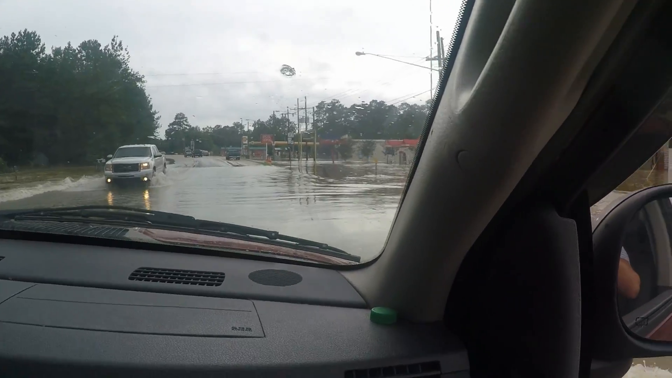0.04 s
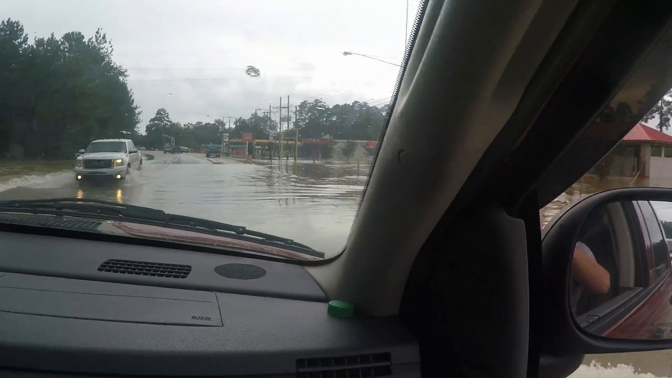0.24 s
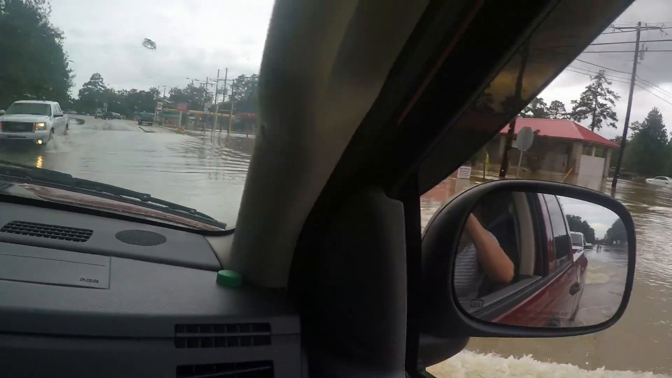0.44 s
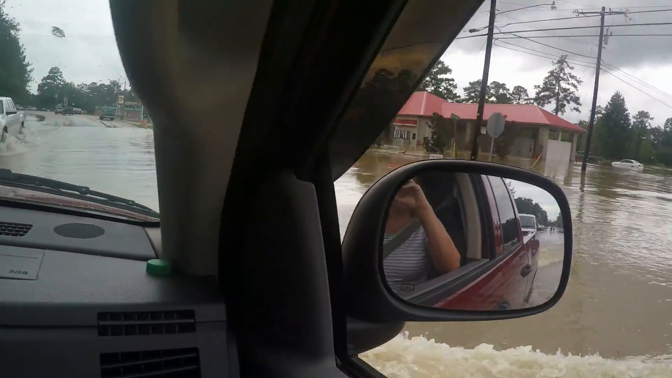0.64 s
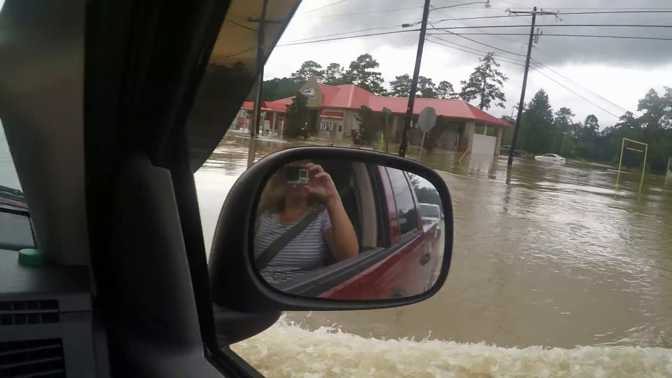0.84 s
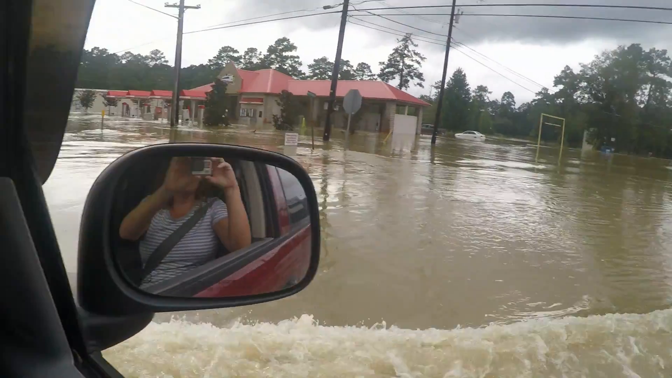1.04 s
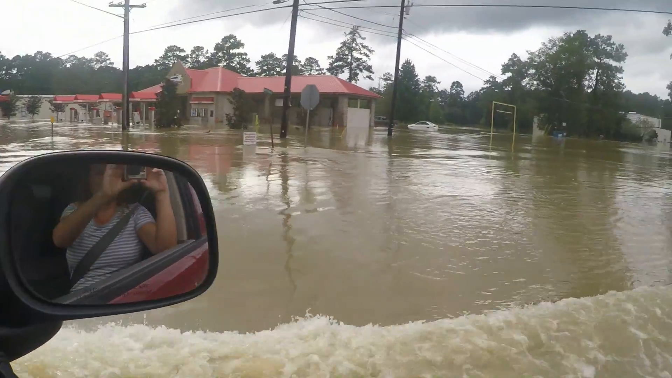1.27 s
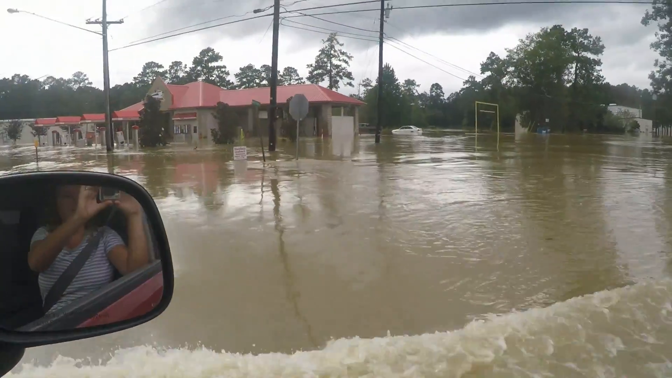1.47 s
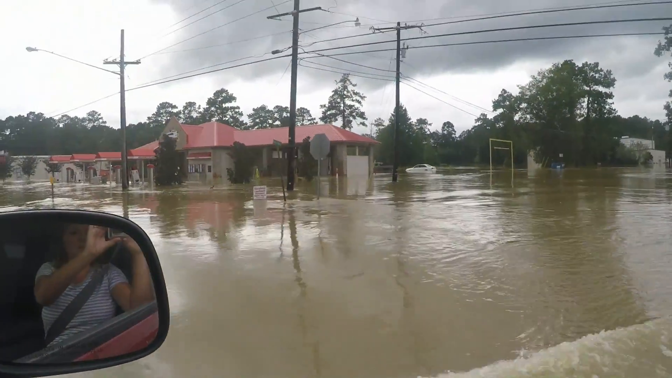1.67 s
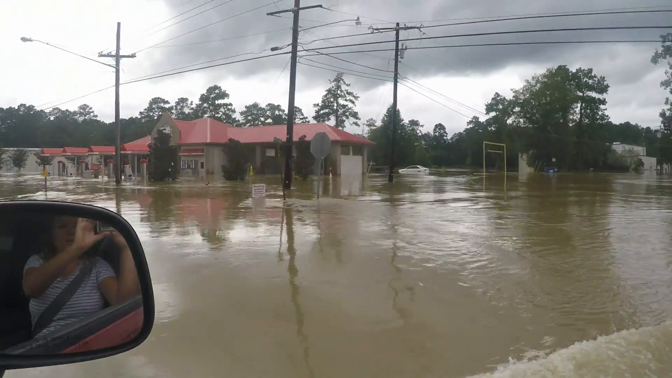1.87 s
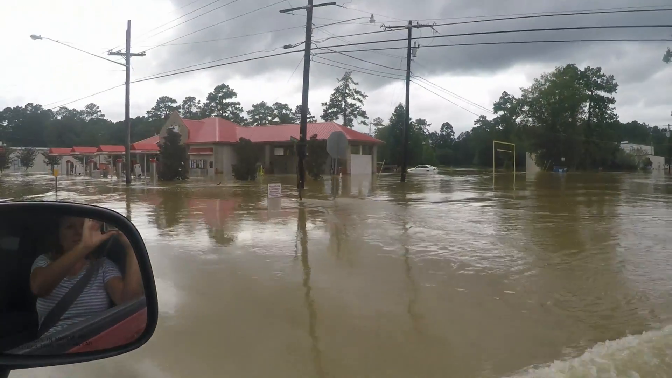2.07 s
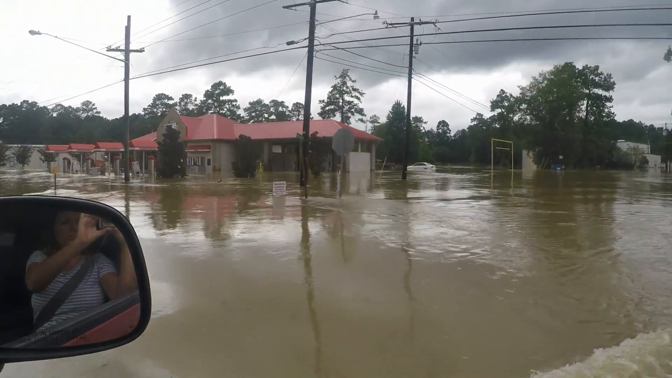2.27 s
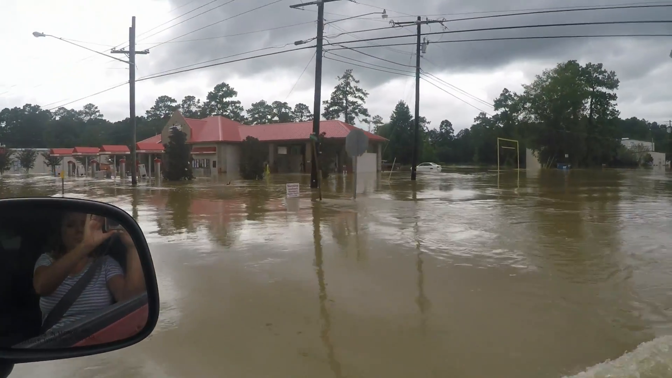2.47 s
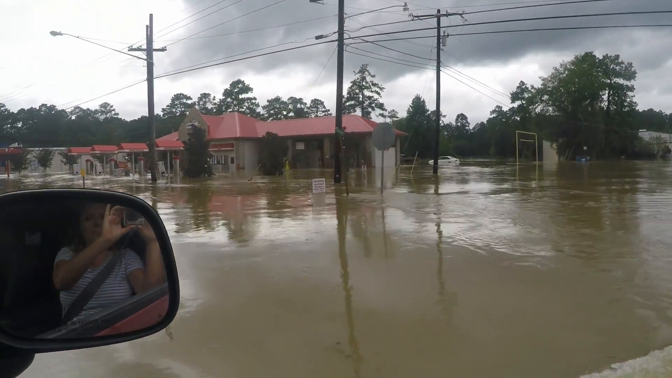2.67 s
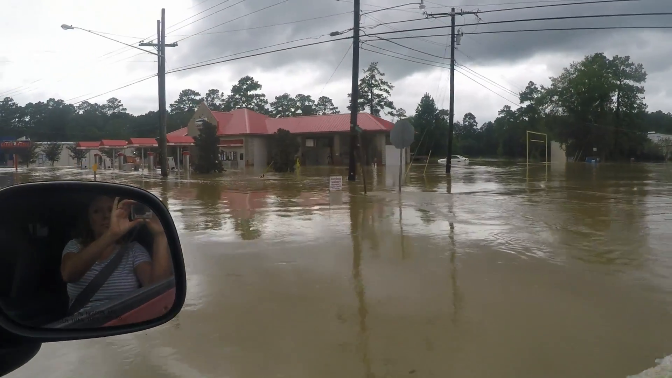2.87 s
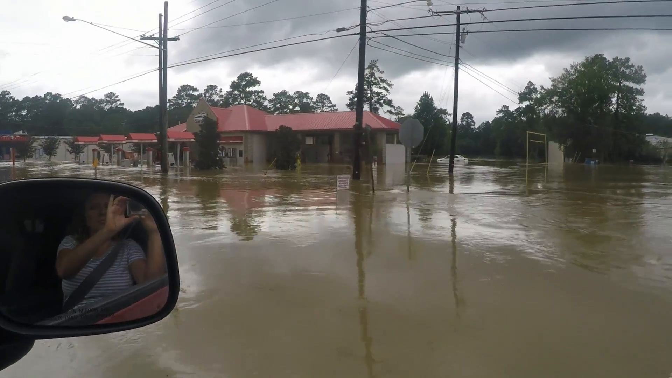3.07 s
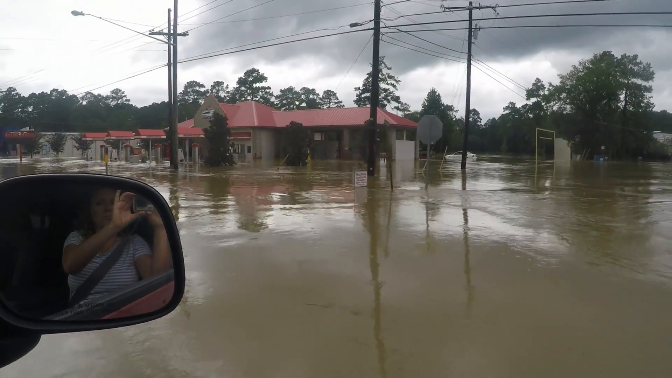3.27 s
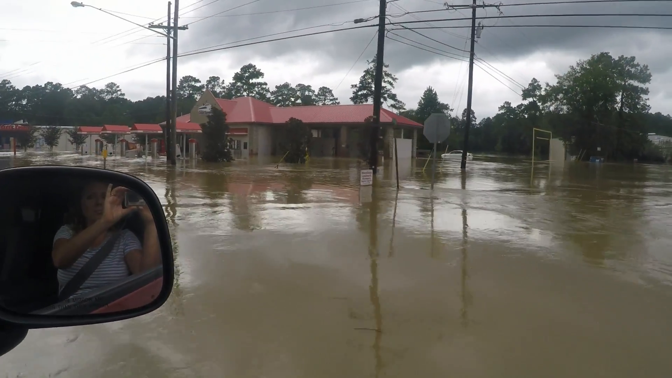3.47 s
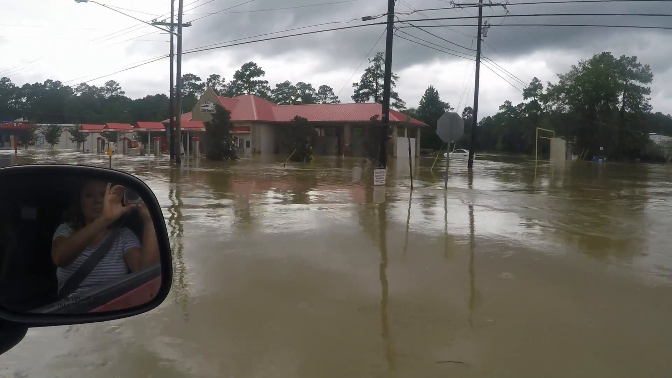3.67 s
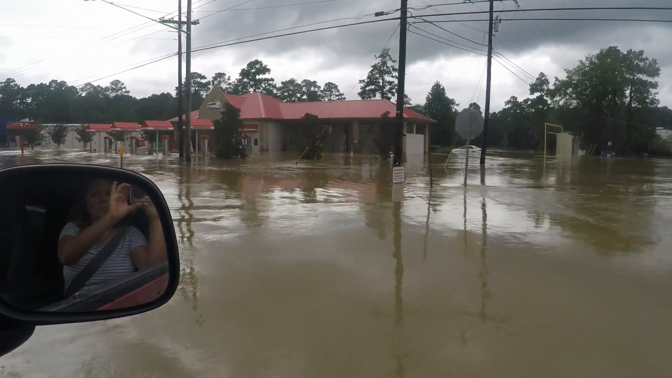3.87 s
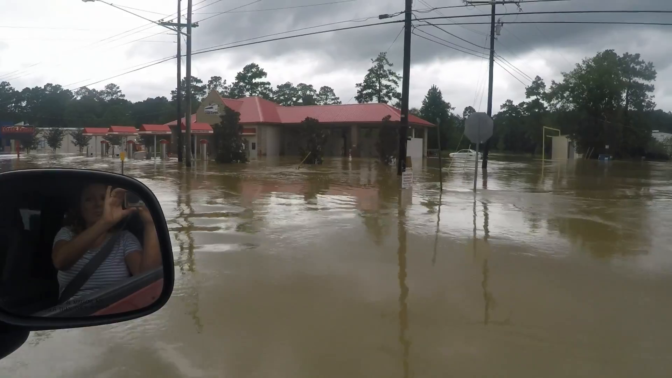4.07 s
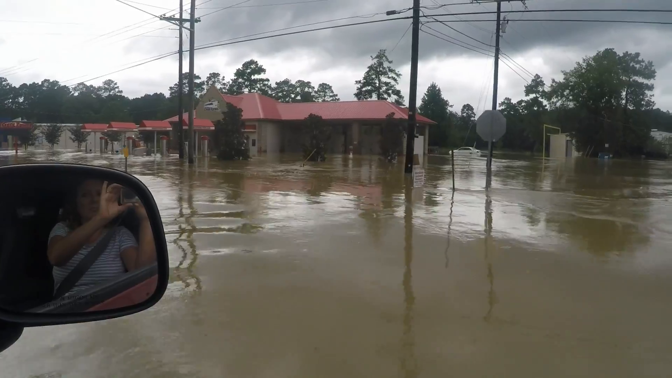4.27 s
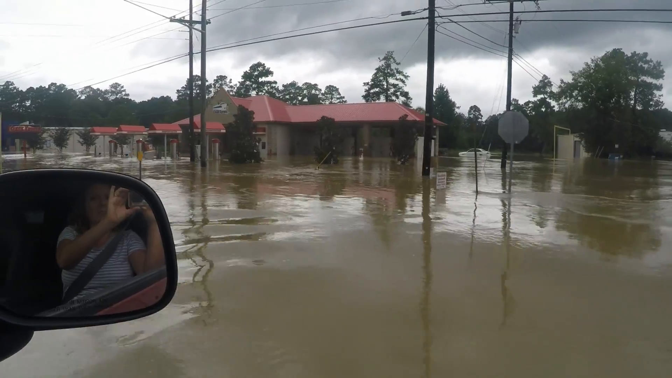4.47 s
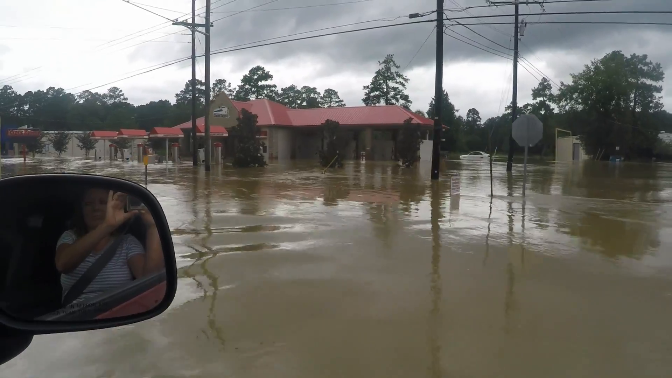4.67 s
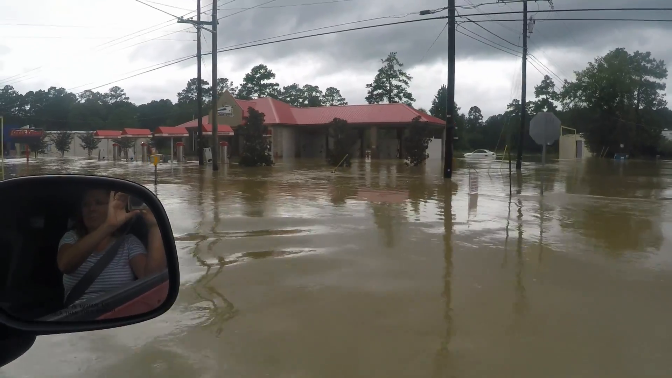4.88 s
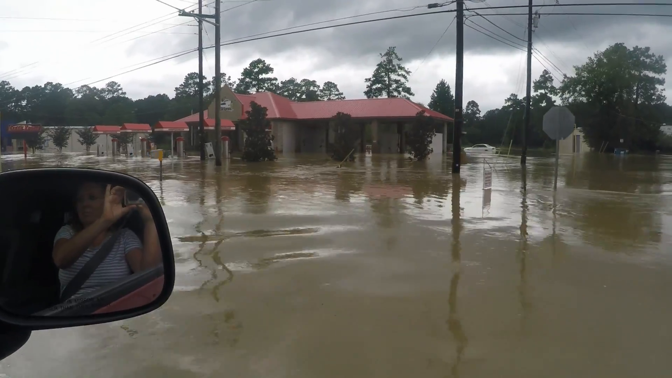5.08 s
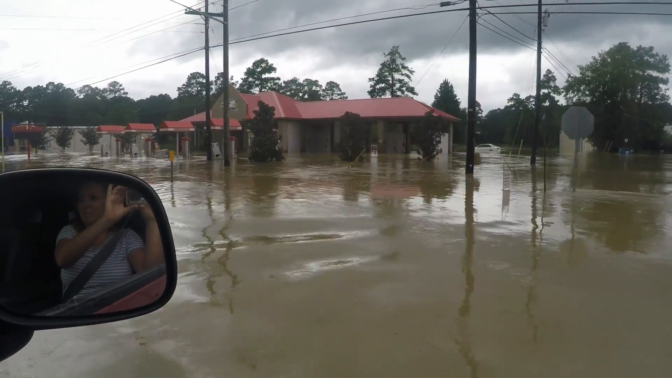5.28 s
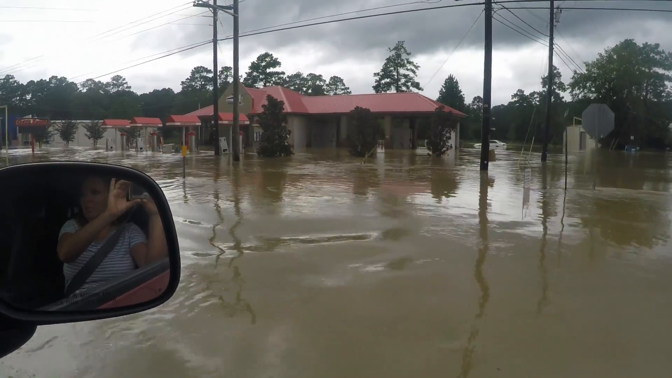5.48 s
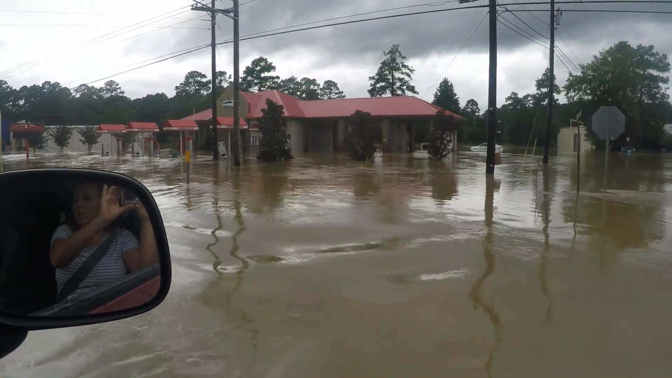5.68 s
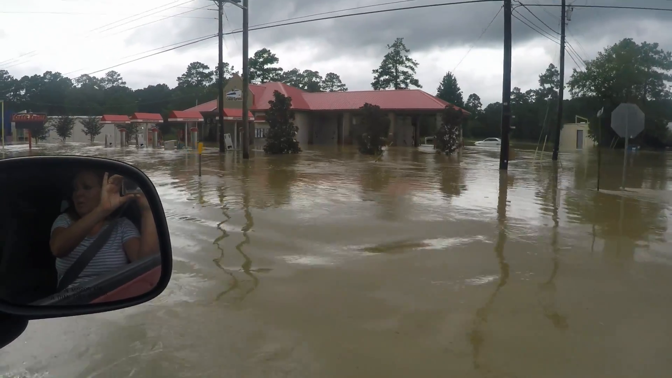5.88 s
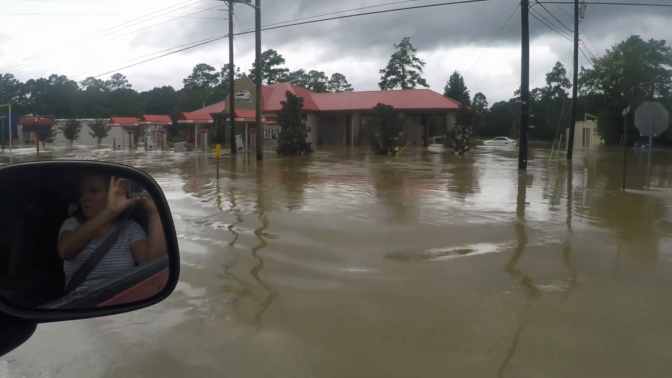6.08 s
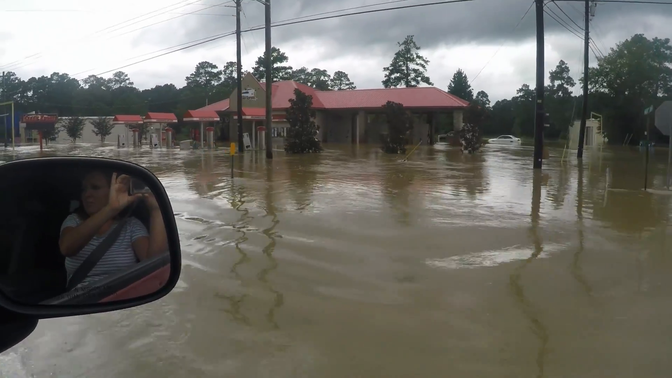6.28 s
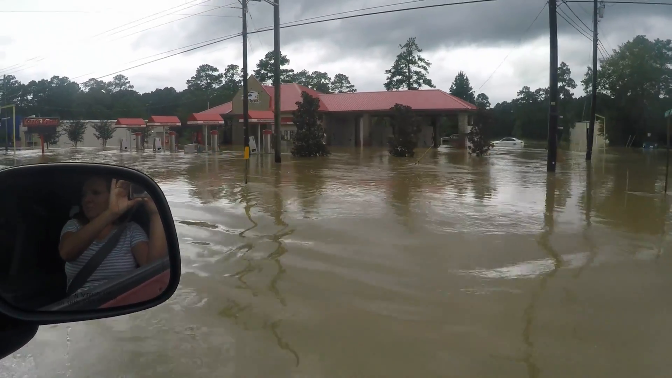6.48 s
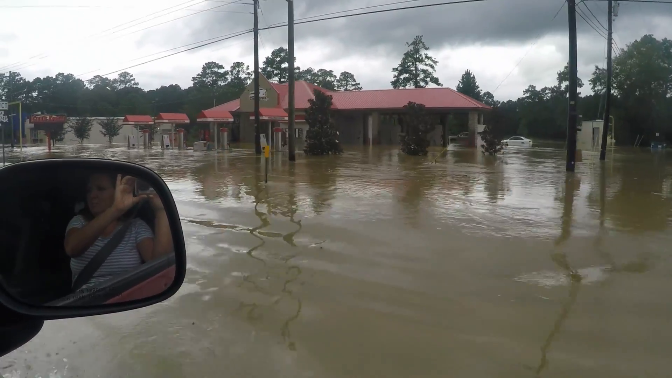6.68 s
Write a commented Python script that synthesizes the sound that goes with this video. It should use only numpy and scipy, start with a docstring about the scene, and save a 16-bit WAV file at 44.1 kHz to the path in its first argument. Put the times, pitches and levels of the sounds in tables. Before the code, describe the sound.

A vehicle wades slowly through deep floodwater with a steady hissing rush, while fingers rub, squeak and tap on the handheld phone early on.

```python
"""Truck wading through floodwater

A truck wades slowly through deep water, heard at its open side window on a hand-held phone.
Bow wave: noise, ringing bubbles and spray clicks. Rumble: coloured noise. Engines: muffled firing orders.
At first fingers rub (filtered slips), squeak (rough sines), tap (ringing modes) and press (low swings)
on the phone's case; later the crest slaps back in short showers of drops."""
import sys
import numpy as np
from scipy import signal
from scipy.fft import rfft, irfft
from scipy.io import wavfile

SR = 44100
rng = np.random.default_rng(int(sys.argv[2]) if len(sys.argv) > 2 else 0)


def materialize(psi):
    """Save the field psi as 16-bit PCM at rate SR to the path in sys.argv[1].

    A 1-D psi becomes a single channel; in a 2-D psi each row is a channel.
    """
    bounded = np.clip(np.atleast_2d(psi).T, -1, 1)
    quanta = np.round(bounded * 32767).astype(np.int16)
    wavfile.write(sys.argv[1], SR, quanta)


N = 296686
TIME = np.arange(N) / SR
HZ = np.fft.rfftfreq(N, 1 / SR)

# Bow wave colour: (frequency [Hz], relative density [dB per Hz])
WATER_COLOUR = [(100, -21.5), (300, -10.5), (480, -15.5), (850, -7.5), (1250, -8), (1600, 0), (2200, 0.5),
                (3400, -3), (4200, -10), (5500, -15), (7500, -17), (10300, -23), (12500, -31),
                (15500, -30.5)]
# Peaks and notches of cupped hand and microphone port: (centre [Hz], width [Hz], height [dB])
PORT_PEAKS = [(1391, 120, -11.5), (1750, 400, 0), (2168, 360, -4), (2703, 410, 4), (3020, 200, -3.5),
              (4010, 81, -7), (6070, 490, -4.5), (7260, 680, 2), (8440, 1900, -2.5)]
# Bow wave rush as the phone turns from cab to window: (time [s], level [dB])
RUSH_LEVEL_DB = [(0, -40), (.3, -46), (.7, -42), (1.35, -42.5), (1.55, -39.5), (1.9, -40), (3.5, -39.5),
                 (6.1, -40.5), (6.73, -39.2)]
# Spray above 5 kHz: shaded by the cab until the phone faces the window, then slowly brightens
SPRAY_LIFT_DB, SPRAY_DB_PER_S, SHADE_DB, WINDOW_S = -1.1, 0.45, -0.5, 1.6

# Road and wind rumble: (frequency [Hz], relative density [dB per Hz])
RUMBLE_COLOUR = [(10, -11), (27, 5), (45, -3), (62, -4), (100, -10.5), (135, -14), (180, -14), (240, -18.5),
                 (320, -22), (450, -26), (900, -37), (4000, -90)]
# Buffeting while the phone is turned: (frequency [Hz], relative density [dB per Hz])
BUFFET_COLOUR = [(10, -3), (26, 6), (48, -0.5), (75, -8), (130, -19), (200, -19.5), (300, -38), (700, -25),
                 (3000, -80)]
ROAD_DB, TURNING_DB, TURN_END_S, TURN_SETTLE_S = -47, -41, 0.73, 2

# Passed by exhaust pipes and cab: (frequency [Hz], relative gain [dB])
EXHAUST_GAIN = [(75, 2.5), (100, -5.5), (122, 2.5), (150, -7.5), (175, 7.5), (205, -6.5), (240, -3),
                (300, -11), (360, -9), (410, -6.5), (470, -40)]
# Truck's engine, idling then lightly throttled: (time [s], mean firing rate [Hz], mean level [dB])
OWN_ENGINE_TRACK = [(0, 71, -65), (1.9, 70, -54.5), (3.6, 72.5, -57), (4.6, 72, -65.5), (5.8, 73.2, -60),
                    (6.73, 78.6, -52)]
# Another engine pulling through its gears:
# (start [s], end [s], mean level [dB], from rate [Hz], towards rate [Hz], time constant [s])
GEAR_REVS = [(0, .52, -56, 93, 108.5, 0.3), (0.651, 1.302, -57.5, 96.1, 84, 0.37),
             (2.8, 3.55, -64, 79.6, 102.2, .55), (3.552, 5.95, -56, 68.9, 124.4, .44)]
REV_FADE_IN_SHARE, REV_FADE_OUT_SHARE = 0.12, 0.16

# Fingers sliding on the case; the three times are sorted before use: (start [s], strongest [s],
# end [s], level before swell [dB], treble tilt [dB per octave], air pocket [Hz], upper edge [Hz])
RUB_STROKES = [(.017, .066, .12, -38.5, 5, 3100, 12000), (0.115, 0.126, .16, -33, 3.5, 3020, 16000),
               (0.168, .219, .228, -36, 2, 3300, 16000), (0.278, .354, 0.4, -38, 0.5, 2400, 16000),
               (0.367, 0.405, 0.4, -32.5, 0, 2330, 16000), (0.437, .444, .48, -37.5, -.5, 1580, 11000),
               (0.477, 0.524, .53, -35, -2.5, 2100, 12000), (0.583, 0.604, 0.62, -30.5, 0.5, 2060, 11000),
               (0.608, 0.638, 0.67, -26.5, 0.3, 1650, 10100), (0.727, 0.737, 0.8, -30.5, -4, 1580, 11000),
               (0.736, 0.781, .83, -27.5, -0.5, 1540, 13000), (.79, 0.832, 0.896, -33.5, 0, 1550, 13000),
               (0.97, 1.015, 1.087, -33.5, 0, 1360, 16000), (1.209, 1.21, 1.268, -38.5, 5, 3020, 16000),
               (1.4, 1.426, 1.46, -29.5, -0.7, 1980, 10900), (1.437, 1.5, 1.67, -38.5, -1, 1730, 11000),
               (2.407, 2.47, 2.485, -34.5, 0.6, 2000, 16000),
               (2.491, 2.493, 2.57, -36.5, -0.5, 1970, 12000)]
# Skin on case: (frequency [Hz], relative density [dB per Hz])
SKIN_COLOUR = [(60, -7), (200, -2), (480, -13), (850, -2), (1500, 0.5), (3000, -1.5), (4500, -5),
               (7000, -12), (10000, -19.5), (15500, -18.5)]
# Case resonances: (centre [Hz], width [Hz], height [dB])
CASE_PEAKS = [(1120, 180, -5.5), (2330, 200, 1.5), (2850, 690, 8), (3500, 520, -1), (4230, 500, 7.5),
              (4900, 210, 1.5), (5380, 480, 3.5), (6030, 290, -3.5), (6860, 330, 2.5), (8600, 710, -5),
              (9800, 1600, 5.5)]
POCKET_DB, POCKET_HALF_WIDTH_HZ = 9, 203

# Skin sticking and slipping: (start [s], strongest [s], end [s], level before swell [dB], mean pitch [Hz])
SQUEAK_STROKES = [(0.028, .039, 0.049, -27, 3116), (0.04, 0.082, 0.15, -44, 3050),
                  (0.115, 0.134, 0.14, -25.5, 3120), (.135, 0.143, 0.17, -35, 3170)]
# Fingertip taps: (time [s], peak level [dB], dull modes against bright ones [dB])
FINGER_TAPS = [(0.1899, -23, -25), (.39, -25, -8), (.415, -25, -12), (.4408, -39, -15), (.5179, -7, -3.5),
               (0.5229, -18.5, -1), (.574, -30, 12), (.594, -28, 15), (0.61, -27.5, 6), (.872, -29, -6),
               (.879, -25.5, -3), (1.283, -24, -10), (1.314, -30, 2), (1.3975, -16, -11.5),
               (1.4483, -15, -6.5), (2.410, -33, 0), (2.4609, -19, -5.5), (2.470, -24.5, 1),
               (2.524, -24, -6)]
# Case modes rung by a tap: (frequency [Hz], relative level [dB], t60 [s])
CASE_MODES = [(246, -5, 0.019), (508, -5, 0.016), (900, 6.5, 0.0084), (1500, -2, 0.0062),
              (2320, -10.5, 0.0071), (2910, -8.5, 0.018), (3506, -5.5, 0.013), (5300, -13, .007),
              (9000, -19, 0.0062)]
# Grip pressing on the case: (time [s], peak level [dB], swing frequency [Hz])
GRIP_PRESSES = [(0.193, -28, 66.5), (0.237, -27.5, 25), (0.439, -32, 45), (.521, -24, 55), (.59, -29.5, 80),
                (0.756, -29, 69.5), (.895, -31.5, 87.5), (1.111, -32, 42), (1.447, -26.5, 85.6),
                (1.584, -25, 37.7), (1.596, -36, 139), (1.666, -29.5, 134), (1.735, -36, 151),
                (2.408, -32, 107), (2.461, -32, 169), (2.477, -29.5, 76), (2.521, -28, 62),
                (2.565, -32, 85), (2.674, -33.5, 35.07)]

# Crest slapping back on the water: (time [s], level before swell [dB])
CREST_SPLASHES = [(1.709, -41.5), (2.6, -42), (3.055, -41.5), (3.26, -45.5), (3.457, -39.5), (4.07, -45.5),
                  (4.683, -41), (5.16, -42.5), (6.282, -39.5), (6.408, -39)]
SPLASH_RISE_S, SPLASH_FALL_S = 0.033, 0.055

EDGE_HZ = 15430


def amp(db):
    """Decibels to gain."""
    return 10 ** (np.asarray(db) / 20)


def unit(x):
    """Scales to an rms of one."""
    return x / np.sqrt(np.mean(x ** 2) + 1e-20)


def curve(rows, column=1):
    """Interpolates one table column over time."""
    rows = np.array(rows)
    return np.interp(TIME, rows[:, 0], rows[:, column])


def colour(points, peaks=()):
    """Smooth spectrum in dB plus bell-shaped peaks and notches."""
    hz, db = np.transpose(points)
    smooth_db = np.interp(np.log(HZ + 1), np.log(hz), db)
    bells_db = sum(height * 2 ** -((2 * (HZ - centre) / width) ** 2) for centre, width, height in peaks)
    return smooth_db + bells_db


def shaped(x, db):
    """Filters by a spectrum in dB, to an rms of one."""
    return unit(irfft(rfft(x) * amp(db), N))


def drift(rate_hz):
    """Random wandering, rms one, with a Gaussian roll-off at the given rate."""
    spectrum = rfft(rng.standard_normal(N))
    return unit(irfft(spectrum * np.exp(-(HZ / rate_hz) ** 2), N))


def clicks(per_s, spread_db):
    """Random clicks of either sign, mostly small and a few large."""
    size = amp(spread_db * np.minimum(rng.exponential(1, N), 6))
    return size * rng.choice([-1, 1], N) * (rng.random(N) < per_s / SR)


def stroke(start_s, top_s, end_s):
    """Swell to a top and fall away, as a finger's speed does."""
    ramp = np.interp(TIME, np.sort([start_s, top_s, end_s]), [0, 1, 0])
    return np.sin(np.pi / 2 * ramp)


def add(mix, time_s, sound):
    """Mixes a sound in at a time."""
    part = mix[max(round(time_s * SR), 0):][:len(sound)]
    part += sound[:len(part)]


def bubbles(count=48):
    """Each bubble rings for a few cycles, rising in pitch as it nears the surface."""
    out = np.zeros(N)
    for hz in np.geomspace(500, 12000, count):
        cycles = np.arange(0, 50, hz / SR)
        ring = np.exp(-cycles / 7) * np.sin(2 * np.pi * cycles * (1 + 0.0018 * cycles))
        births = clicks(per_s=90 * np.sqrt(hz / 2500), spread_db=2.5)
        out += np.sqrt(hz) * unit(signal.oaconvolve(births, ring)[:N])
    return unit(out)


def bow_wave():
    """Bubbles, spray and a smooth wash of foam surge together as the crest tumbles."""
    spray = unit(clicks(per_s=2500, spread_db=2.5))
    foam = rng.standard_normal(N)
    water = foam + amp(-5.5) * bubbles() + amp(-4) * spray
    water = shaped(water, colour(WATER_COLOUR, PORT_PEAKS))

    above_5khz = 1 / (1 + (5000 / (HZ + 1)) ** 4)
    fizz = irfft(rfft(water) * above_5khz, N)
    shade_db = SHADE_DB / (1 + (TIME / WINDOW_S) ** 20)
    lift_db = SPRAY_LIFT_DB + SPRAY_DB_PER_S * TIME + shade_db
    water = water + fizz * (amp(lift_db + 0.5 * drift(rate_hz=37)) - 1)

    surge_db = 0.35 * drift(rate_hz=4.4) + 0.37 * drift(rate_hz=25)
    return water * amp(curve(RUSH_LEVEL_DB) + surge_db)


def rumble():
    """Lumpy low noise of the cab; air buffets the phone, fading once it has been turned."""
    turning = np.clip(1 - (TIME - TURN_END_S) / TURN_SETTLE_S, 0, 1)
    road = shaped(rng.standard_normal(N), colour(RUMBLE_COLOUR))
    road = road * amp(ROAD_DB + 0.63 * drift(rate_hz=10))
    buffet = shaped(rng.standard_normal(N), colour(BUFFET_COLOUR))
    buffet = buffet * amp(TURNING_DB + 1.5 * drift(rate_hz=12))
    return road + turning * buffet


def engine(rate_hz, level_db, fall_db_per_octave, count=4):
    """Muffled exhaust: orders of the firing rate slide through the resonances of the pipe."""
    firing_hz = rate_hz * (1 + 0.0063 * drift(rate_hz=7.3))
    phase = 2 * np.pi * np.cumsum(firing_hz) / SR
    orders = np.arange(1, count + 1)[:, None]
    pipe_db = np.interp(orders * firing_hz, *np.transpose(EXHAUST_GAIN))
    gains = amp(pipe_db - fall_db_per_octave * np.log2(orders))
    hum = unit((gains * np.sin(orders * phase)).sum(0))
    return hum * amp(level_db + 1.1 * drift(rate_hz=12))


def own_engine():
    """The truck's dull hum, close to idle: upper orders fall steeply."""
    rate_hz = curve(OWN_ENGINE_TRACK)
    level_db = curve(OWN_ENGINE_TRACK, column=2)
    return engine(rate_hz, level_db, fall_db_per_octave=15)


def other_engine():
    """After each gear or throttle change the speed settles exponentially; the hum swells and fades."""
    out = np.zeros(N)
    for start_s, end_s, db, from_hz, to_hz, lag_s in GEAR_REVS:
        elapsed_s = np.maximum(TIME - start_s, 0)
        rate_hz = to_hz + (from_hz - to_hz) * np.exp(-elapsed_s / lag_s)
        progress = (TIME - start_s) / (end_s - start_s)
        fade_in, fade_out = progress / REV_FADE_IN_SHARE, (1 - progress) / REV_FADE_OUT_SHARE
        heard = np.clip(np.minimum(fade_in, fade_out), 0, 1)
        out += heard * engine(rate_hz, db, fall_db_per_octave=3.0)
    return out


def rubs():
    """Skin ridges slip on the case; the air pocket under each finger resonates at its own pitch."""
    slips = rng.standard_normal(N) + 0.8 * unit(clicks(per_s=5000, spread_db=1.0))
    slips = slips * amp(0.7 * drift(rate_hz=140))
    slips = shaped(slips, colour(SKIN_COLOUR, CASE_PEAKS))
    out, size = np.zeros(N), SR // 4
    hz = np.fft.rfftfreq(size, 1 / SR)
    for start_s, top_s, end_s, db, tilt_db, pocket_hz, edge_hz in RUB_STROKES:
        pocket_db = POCKET_DB / (1 + ((hz - pocket_hz) / POCKET_HALF_WIDTH_HZ) ** 2)
        treble_db = tilt_db * np.log2(np.maximum(hz, 900) / 900)
        touch = amp(treble_db) / np.sqrt(1 + (hz / edge_hz) ** 8)
        first = max(round(start_s * SR), 0)
        span = slice(first, first + size)
        scrape = unit(irfft(rfft(slips[span]) * amp(pocket_db) * touch, size))
        out[span] += amp(db) * scrape * stroke(start_s, top_s, end_s)[span]
    return out


def squeaks():
    """Regular stick and slip gives a short, rough whistle."""
    turns_s = np.cumsum(1 + 0.02 * drift(rate_hz=380)) / SR  # jittered time
    grip = amp(2.6 * drift(rate_hz=220))
    out = np.zeros(N)
    for start_s, top_s, end_s, db, hz in SQUEAK_STROKES:
        whistle = unit(np.sin(2 * np.pi * hz * turns_s))
        out += amp(db) * stroke(start_s, top_s, end_s) ** 2 * whistle
    return grip * out


def taps():
    """The case rings for milliseconds; a soft pad favours its low modes, a nail adds a fine tick."""
    out, t = np.zeros(N), np.arange(SR // 20) / SR
    contact = 1 - np.exp(-(t / 0.0005) ** 2)
    grit_lowpass = signal.butter(4, 9000, fs=SR, output="sos")
    for time_s, db, dull_db in FINGER_TAPS:
        ring = np.zeros(len(t))
        for k, (hz, level_db, t60_s) in enumerate(CASE_MODES):
            mode_db = level_db + dull_db * (hz < 1200) - 60 * t / t60_s
            ring += (-1) ** k * amp(mode_db) * np.sin(2 * np.pi * hz * t)
        grit = signal.sosfilt(grit_lowpass, rng.standard_normal(len(t)))
        tick = amp(-27.5 - dull_db - 60 * t / 0.019) * grit
        blow = contact * (ring + tick)
        add(out, time_s, amp(db) * blow / abs(blow).max())
    return out


def presses():
    """The case flexes in and springs back: one soft, low, heavily damped swing."""
    out = np.zeros(N)
    for time_s, db, hz in GRIP_PRESSES:
        cycles = np.arange(SR // 5) * hz / SR
        swing = -np.sin(2 * np.pi * cycles) * cycles * np.exp(-cycles / 0.31)
        add(out, time_s, amp(db) * swing / abs(swing).max())
    return out


def splashes():
    """Short showers of drops: dense clicks, brighter than the rush."""
    brighter_db = 3 * np.log2(1 + HZ / 3000)
    drops = clicks(per_s=6000, spread_db=3.0)
    drops = shaped(drops, colour(WATER_COLOUR, PORT_PEAKS) + brighter_db)
    swell = np.zeros(N)
    for time_s, db in CREST_SPLASHES:
        swell += amp(db) * stroke(time_s - SPLASH_RISE_S, time_s, time_s + SPLASH_FALL_S) ** 2
    return drops * swell


def scene():
    """Water and engines outside, fingers on the phone."""
    outside = bow_wave() + rumble() + own_engine() + other_engine() + splashes()
    fingers = rubs() + squeaks() + taps() + presses()
    return (outside + fingers)[None]


def record(dry):
    """The phone's band limit: a steep linear-phase lowpass."""
    lowpass = signal.firwin(1023, EDGE_HZ, window=("kaiser", 9), fs=SR)
    return signal.oaconvolve(dry, lowpass[None], "same")


dry = scene()
out = record(dry)
materialize(out)
```